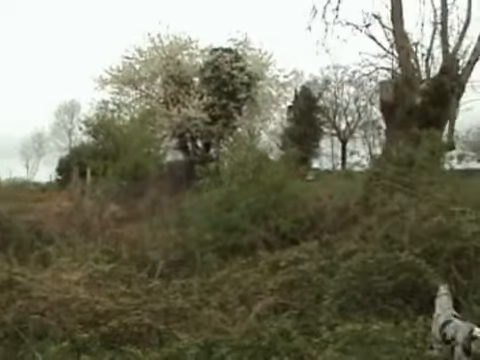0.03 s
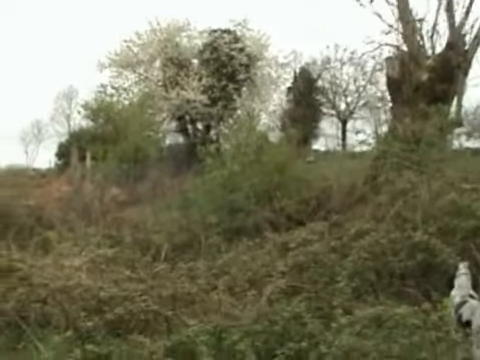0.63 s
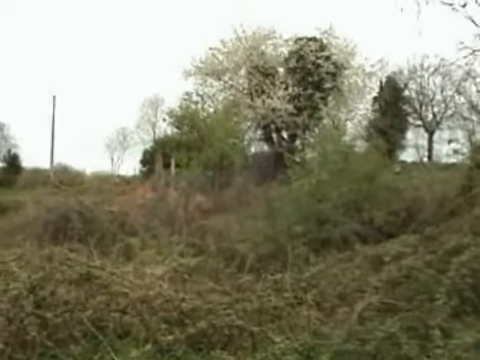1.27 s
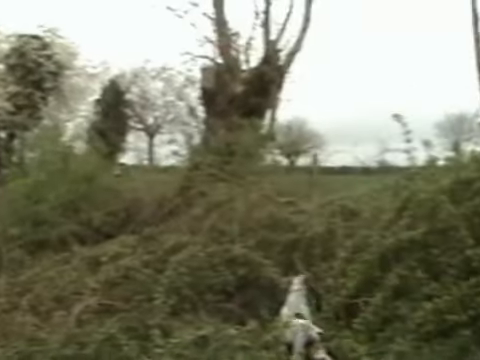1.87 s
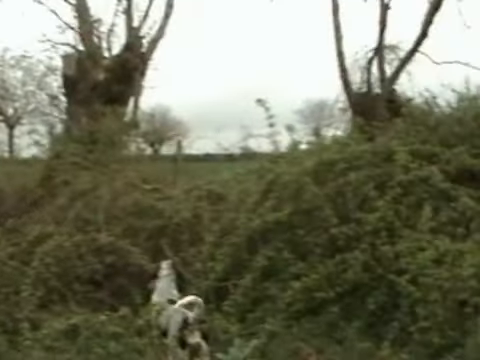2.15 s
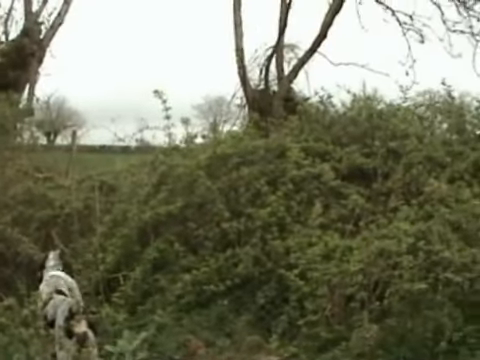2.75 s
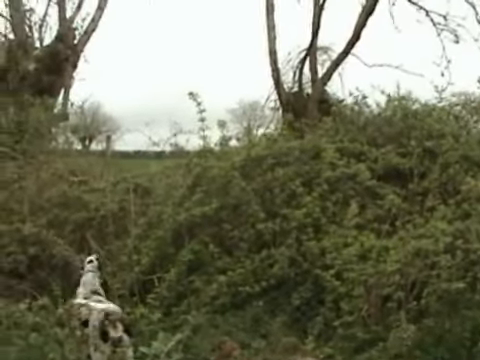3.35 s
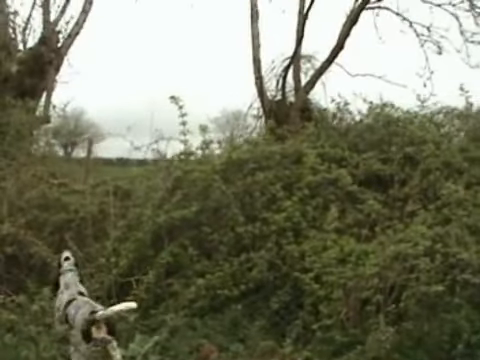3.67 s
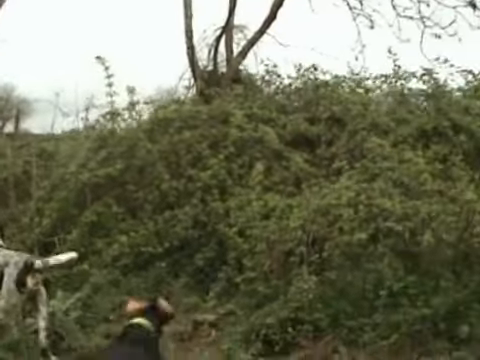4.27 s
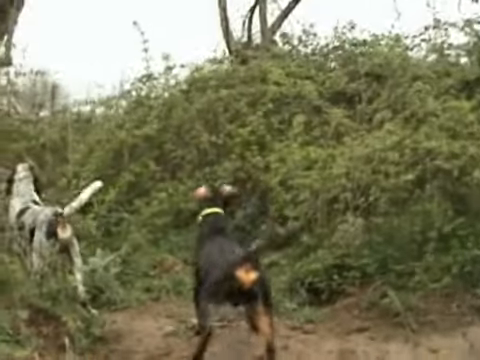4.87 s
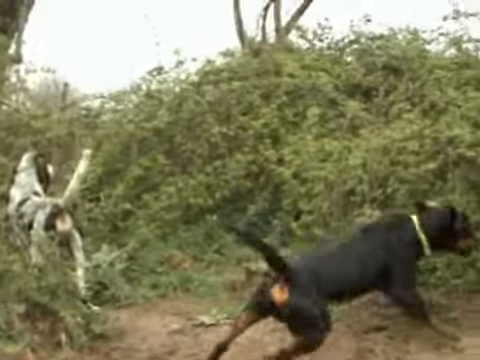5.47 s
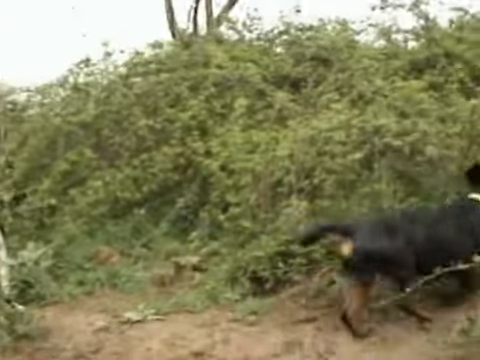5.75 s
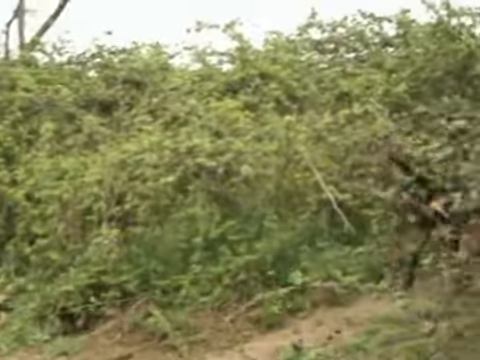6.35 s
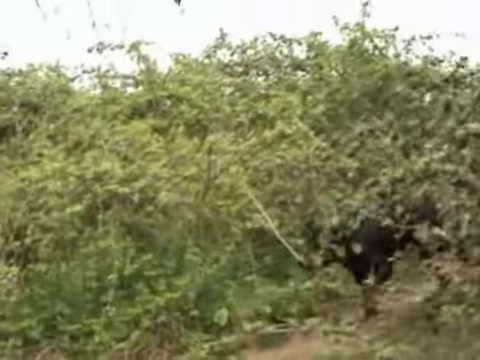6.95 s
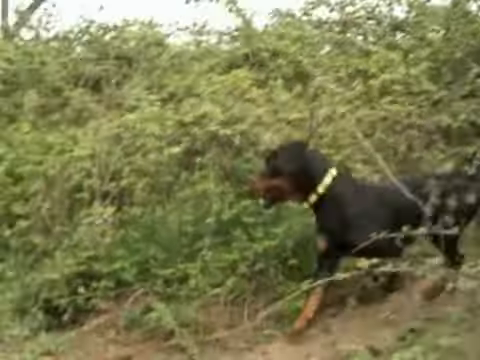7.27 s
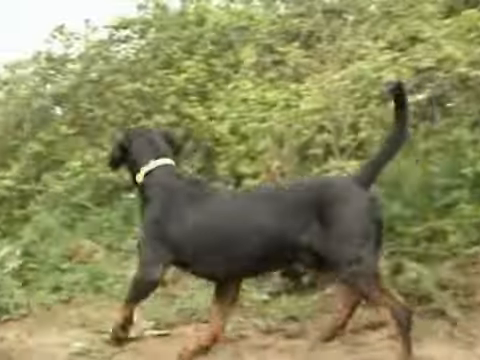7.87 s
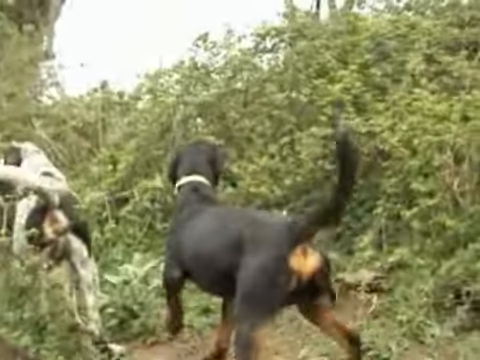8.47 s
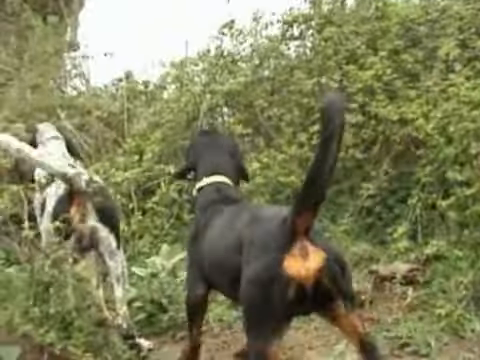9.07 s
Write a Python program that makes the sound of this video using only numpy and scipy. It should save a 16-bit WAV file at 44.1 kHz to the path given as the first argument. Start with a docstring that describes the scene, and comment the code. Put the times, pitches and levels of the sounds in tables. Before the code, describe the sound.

Quick yelping barks repeat unevenly from start to finish, a few metres from the microphone in open country. A second dog whines thinly, gives two drawn-out hoarse bays, whines again, then bays twice more among short whimpers, its voice cracking between rough and clear notes. Underneath are faint rustling scrub, occasional twig snaps and a low rumble, with only a light outdoor echo.

```python
"""Open farmland, at a bramble hedge: hunting dogs give tongue a few metres away.
One barks in quick yelps that arch in pitch as its jaw snaps open and shut. A hound answers with
long hoarse bays, its vocal folds locking into clean notes and cracking into chaotic flapping,
and with thin whines. Leaves and twigs crackle in the scrub; the hedges send back a faint echo."""
import sys
import numpy as np
from scipy import signal
from scipy.fft import rfft, irfft, next_fast_len
from scipy.io import wavfile
from scipy.ndimage import uniform_filter1d, minimum_filter1d, map_coordinates

SR = 44100
rng = np.random.default_rng(int(sys.argv[2]) if len(sys.argv) > 2 else 0)


def generate_wav(signal):
    """Clip the signal to [-1, 1] and save it as 16-bit WAV at the path in sys.argv[1]."""
    frames = np.transpose(np.atleast_2d(signal))
    scaled = np.clip(frames, -1, 1) * 32767
    pcm = np.round(scaled).astype(np.int16)
    wavfile.write(sys.argv[1], SR, pcm)


N = 407043


def amp(db):
    """Decibels to gain."""
    return 10 ** (np.asarray(db) / 20)


def unit(x):
    """Scale to rms 1."""
    return x / np.sqrt(np.mean(x ** 2) + 1e-20)


def along(points, hz):
    """(Hz, value) points read on a log axis."""
    freqs, values = np.transpose(points)
    return np.interp(np.log(hz + 1), np.log(freqs + 1), values)


def curves(rows, t):
    """Every column after the first, read at t."""
    times, *columns = np.transpose(rows)
    return [np.interp(t, times, column) for column in columns]


def span(start, end, fade_s):
    """Sample times and soft gate of one call."""
    t = np.arange(round((start - fade_s) * SR), round((end + 2 * fade_s) * SR)) / SR
    return t, np.clip((t - start) / fade_s + .5, 0, 1) * np.clip((end - t) / (2 * fade_s) + 1, 0, 1)


def add(track, t, x):
    """Mix x into the track at its sample times."""
    at = round(t[0] * SR) + np.arange(len(t))
    inside = (at >= 0) & (at < N)
    track[..., at[inside]] += x[..., inside]


def wobble(t, rate_hz):
    """Smooth random curve, rate_hz knots a second."""
    knots = rng.standard_normal(int((t[-1] - t[0]) * rate_hz) + 4)
    return map_coordinates(knots, [(t - t[0]) * rate_hz])


def bump(t, middle, length):
    """Flat-topped window."""
    return np.exp(-(2 * (t - middle) / length) ** 4)


def swell(age, length, attack_s, droop_db, release_s):
    """Attack, drooping hold, release."""
    attack = 1 - np.exp(-(np.maximum(age, 0) / attack_s) ** 2)
    release = np.exp(-np.maximum(age - length, 0) / release_s)
    return attack * amp(-droop_db * (age / length - .5)) * release


def coloured(x, spectrum):
    """x through a (Hz, dB) shape, at rms 1."""
    n = x.shape[-1]
    size = next_fast_len(n + 2048)
    gain = amp(along(spectrum, np.fft.rfftfreq(size, 1 / SR)))
    return unit(irfft(rfft(x, size) * gain, size)[..., :n])


def spread(mid, side, width):
    """Mid and side to stereo."""
    return (mid + width * side * np.array([[1], [-1]])) / np.hypot(1, width)


def stereo_noise(width):
    """Partly correlated white noise."""
    return spread(rng.standard_normal(N), rng.standard_normal(N), width)


# Air spectrum: (frequency [Hz], gain [dB])
AIR_SPECTRUM = [(25, -13.5), (200, -24), (1000, -8.5), (3000, -19.5), (6500, -22), (15500, -49.5)]


def still_air(level_db=-55.5):
    """Steady hush of country air."""
    return amp(level_db) * coloured(stereo_noise(width=.18), AIR_SPECTRUM)


# Hedge decay: (frequency [Hz], unscaled t60 [s])
HEDGE_DECAY = [(200, 0.76), (1000, 0.62), (2500, 0.96), (8000, 0.45)]


def hedge_echo(x, t60_scale, delay_s, width):
    """Diffuse scatter from vegetation; the top treble dies first."""
    hz, t, noise = signal.stft(rng.standard_normal((2, SR)), SR, nperseg=256)
    t60_s = t60_scale * along(HEDGE_DECAY, hz)[:, None]
    mid, side = signal.istft(noise * amp(-60 * t / t60_s), SR, nperseg=256)[1]
    tail = spread(mid, side, width) / np.linalg.norm(mid)
    delayed = np.pad(tail, ((0, 0), (int(delay_s * SR), 0)))
    return signal.fftconvolve(x[None], delayed, axes=1)[:, :N]


# Low rumble and rustling leaves: (time [s], rumble [dB], rustle [dB])
RUMBLE_AND_RUSTLE = [(0.0, -55.5, -52.5), (0.64, -55, -49.5), (1.23, -45, -59.5), (1.54, -60.5, -47.5),
                     (2.47, -63.5, -65.5), (2.9, -48.5, -44), (5.68, -55, -43.5), (6.6, -49, -36.5),
                     (7.58, -45, -50), (8.33, -46.5, -44), (8.76, -41, -70.5), (9.23, -48.5, -36.5)]
# Dry twigs: (time [s], level [dB])
TWIG_SNAPS = [(1.0814, -28.5), (3.599, -41.5), (3.737, -37.5), (4.107, -31), (4.1607, -29.5), (4.2095, -31),
              (5.34, -46.5), (5.3696, -34.5), (7.318, -44.5)]
# Spectra of rumble and of leaves and twigs: (frequency [Hz], gain [dB])
RUMBLE_SPECTRUM = [(20, -17), (60, 0), (130, 0), (220, -1.5), (330, -13.5), (800, -39)]
CRACKLE_SPECTRUM = [(300, 10), (3500, -5), (6500, -5), (10000, -20.5), (15500, -30)]


def rumble_and_scrub(rumble_trim_db=1, rustle_trim_db=-3, snap_trim_db=-2.5, snap_t60_s=.049):
    """Low rumble that swells around the calls, leaves rustling, twigs snapping."""
    t = np.arange(N) / SR
    rumble_db, rustle_db = curves(RUMBLE_AND_RUSTLE, t)
    lumps = amp(rumble_db + rumble_trim_db + 3.5 * wobble(t, 14))
    rumble = lumps * coloured(stereo_noise(width=1.3), RUMBLE_SPECTRUM)
    clumps = amp(4 * wobble(t, 25) + 7 * wobble(t, 600))
    leaves = coloured(clumps * stereo_noise(width=.13), CRACKLE_SPECTRUM)
    snaps = sum(amp(db - 60 * np.abs(t - at) / snap_t60_s) * (t >= at) for at, db in TWIG_SNAPS)
    twigs = snaps * coloured(stereo_noise(width=.32), CRACKLE_SPECTRUM)
    return rumble + amp(rustle_db + rustle_trim_db) * leaves + amp(snap_trim_db) * twigs


def clean_folds(t, pitch_hz, levels_db, jitter, shimmer_db):
    """Clean phonation, slightly unsteady in pitch and level: (voice, phase)."""
    unsteady_hz = pitch_hz * (1 + .0045 * wobble(t, 45) + jitter * wobble(t, 400))
    phase = 2 * np.pi * np.cumsum(unsteady_hz) / SR
    voice = sum(amp(db + shimmer_db * wobble(t, 60)) * np.sin(k * phase)
                for k, db in enumerate(levels_db, 1))
    return np.sqrt(2) * voice, phase


def rough_folds(phase, turbulence):
    """Glottal harmonics, phases spread by the throat, plus turbulence puffing once a cycle."""
    lags = rng.uniform(0, 2 * np.pi, 18)
    pulses = unit(sum(np.cos(k * phase + lag) for k, lag in enumerate(lags, 1)))
    puffs = unit((4.3 + np.cos(phase)) * rng.standard_normal(len(phase)))
    share = np.clip(turbulence, 0, 1)
    return np.sqrt(1 - share) * pulses + np.sqrt(share) * puffs


def muzzle_hiss(phase, spectrum, width):
    """Upper muzzle resonances; short detours over ground and leaves comb each call differently."""
    detours = rng.standard_normal((2, 260)) * np.exp(-np.arange(260) / 70)
    paths = [unit(signal.fftconvolve(rough_folds(phase, turbulence=.65), detour)[:len(phase)])
             for detour in detours]
    return coloured(spread(*paths, width), spectrum)


# Hound's snarl band: (frequency [Hz], gain [dB])
HOUND_SNARL = [(700, -44.5), (1150, -6), (1420, 12), (1700, 0.5), (2050, 2), (2350, -22), (2750, -44.5),
               (5000, -71)]


def hound_tract(x):
    """Mid resonances that colour the hound's breath and snarl."""
    return coloured(x, HOUND_SNARL)


# Contours, one list per call: (time [s], pitch [Hz], level [dB])
WHINE_CONTOURS = [
    [(0.335, 1218, -24.5), (0.345, 1240, -9), (0.367, 1177, -14.5), (0.679, 1190, -16), (0.731, 1228, -14),
     (0.971, 1181, -19), (1.063, 1081, -23), (1.08, 1070, -37)],
    [(4.57, 1323, -21.5), (4.62, 1225, -9), (4.644, 1202, -15), (4.656, 1335, -13), (4.696, 1372, -18),
     (4.892, 1082, -24.5), (5.134, 1030, -23), (5.15, 1063, -27.5)],
]
WHIMPER_CONTOURS = [
    [(6.01, 1216, -35), (6.026, 1191, -12.5), (6.084, 1172, -13.5), (6.12, 1126, -30)],
    [(6.845, 1142, -42), (6.857, 1087, -25), (6.893, 1150, -26.5), (6.99, 1081, -24.5)],
    [(7.205, 1176, -41), (7.215, 1127, -28.5), (7.317, 1143, -25.5), (7.325, 1094, -32)],
    [(8.93, 1200, -23), (9.0, 1127, -18), (9.124, 1189, -24.5), (9.22, 1078, -25)],
]
# Hoarse stretches: (middle [s], length [s], half-order level re note [dB])
VOICE_BREAKS = [(4.701, 0.57, -13.5), (4.918, 0.11, -22), (6.972, 0.086, -13), (7.265, 0.029, -5.5),
                (9.035, 0.043, -4)]
# Overtones the muzzle passes: (frequency [Hz], level re note [dB])
MUZZLE_OVERTONES = [(2050, -5.5), (2260, -5), (2400, -21), (2750, -22.5), (3500, -31), (4600, -35.5),
                    (6000, -38.5), (9000, -54)]


def whines(jitter=.006, shimmer_db=1.1, breath_db=-33):
    """A thin high note whose octave flares as it sinks into the muzzle's resonance."""
    out = np.zeros(N)
    for contour in list(WHINE_CONTOURS) + list(WHIMPER_CONTOURS):
        t, gate = span(contour[0][0], contour[-1][0], fade_s=.007)
        pitch_hz, level_db = curves(contour, t)
        # In a break the voice trembles and alternate cycles differ, doubling the period.
        tremble = 1 + 2 * sum(bump(t, at, length) for at, length, _ in VOICE_BREAKS)
        doubling = sum(bump(t, at, length) * amp(db) for at, length, db in VOICE_BREAKS)
        levels_db = [0] + [along(MUZZLE_OVERTONES, k * pitch_hz) for k in range(2, 9)]
        voice, phase = clean_folds(t, pitch_hz, levels_db, jitter * tremble, shimmer_db * tremble ** .5)
        half_orders = .49 * np.sin(phase / 2) + .47 * np.sin(1.5 * phase) + .17 * np.sin(2.5 * phase)
        breath = amp(breath_db) * tremble * hound_tract(rng.standard_normal(len(t)))
        add(out, t, gate * amp(level_db) * (voice + doubling * half_orders + breath))
    return out


# Clean notes in and around the bays: (start [s], length [s], attack [s], first pitch [Hz],
# middle pitch [Hz], last pitch [Hz], fundamental [dB], octave [dB], droop [dB])
BAY_NOTES = [(1.273, 0.047, 0.0044, 834, 901, 1092, -13.5, -26, 4.5),
             (1.32, 0.046, .006, 1142, 1105, 960, -18.5, -39.5, 16),
             (1.818, 0.12, 0.024, 436, 490.5, 497, -23.5, -51, 21.5),
             (3.284, 0.041, 0.0013, 637, 563, 544, -10.5, -35.5, 6),
             (4.168, 0.1, 0.023, 496, 496.6, 507.4, -14, -32.5, -2),
             (4.285, 0.034, 0.011, 500, 522, 507, -24.5, -49, 11.5),
             (6.069, .1, 0.011, 467, 626, 510, -11.5, -19, 1.5),
             (6.25, .56, .03, 440, 406.3, 533, -19.5, -27, 9),
             (6.75, 0.067, 0.017, 1225, 1290, 1295, -15.5, -38, 3),
             (7.892, 0.065, 0.0038, 783, 835, 948, -25, -22.5, -14),
             (8.12, .15, 0.02, 503.5, 538.3, 482, -18.5, -23, 4.5),
             (8.44, .19, 0.0088, 593.4, 527, 544, -20.5, -36, 9)]


def clear_notes(third_db=-14, fall_db=9, breath_db=-21):
    """Locked folds give one bending note: fundamental, octave, faint falling overtones."""
    out = np.zeros(N)
    for start, length, attack_s, first_hz, middle_hz, last_hz, db, octave_db, droop_db in BAY_NOTES:
        t, gate = span(start, start + length, fade_s=.0084)
        bend = np.polyfit([0, .5, 1], [first_hz, middle_hz, last_hz], 2)
        pitch_hz = np.polyval(bend, np.clip((t - start) / length, 0, 1))
        levels_db = [db, octave_db] + [(db + octave_db) / 2 + third_db - fall_db * k for k in range(6)]
        voice, _ = clean_folds(t, pitch_hz, levels_db, jitter=.015, shimmer_db=1.2)
        breath = amp(db + breath_db) * hound_tract(rng.standard_normal(len(t)))
        envelope = gate * swell(t - start, length, attack_s, droop_db, release_s=.014)
        add(out, t, envelope * (voice + breath))
    return out


def gliding_mouth(x, centre_hz, width_hz=420):
    """A resonance that follows the jaw, cross-faded across a filter bank."""
    steps_hz = np.arange(500, 1600, 100)
    size = next_fast_len(2 * len(x)) // 2 * 2
    hz = np.fft.rfftfreq(size, 1 / SR)
    peaks = (1 + (2 * (hz - steps_hz[:, None]) / width_hz) ** 2) ** -1.4
    low_cut = 1 / (1 + (380 / (hz + 1)) ** 8)
    bank = irfft(rfft(x, size) * peaks * low_cut)[:, :len(x)]
    fades = [np.interp(centre_hz, steps_hz, pick) for pick in np.eye(len(steps_hz))]
    return unit(sum(unit(band) * fade for band, fade in zip(bank, fades)))


def limit_swing(x, squeeze):
    """Folds can only swing so far: the largest surges flatten."""
    power = np.abs(uniform_filter1d(x ** 2, size=220))
    return unit(x / (power + .14) ** (squeeze / 2))


# Bays: (start [s], length [s], level [dB], mouth at onset [Hz], at middle [Hz], at end [Hz],
# chest [dB], snarl [dB], hiss [dB]); last three re mouth, before offsets
HOARSE_BAYS = [(1.313, 0.61, -14.5, 1051, 690, 940, -8.5, -15, -30),
               (3.314, 0.98, -15.5, 800, 680, 953, -6, -16.5, -33.5),
               (6.219, .64, -15, 926, 980, 1330, 1, -17, -24.5),
               (6.985, 0.28, -24, 915, 920, 1030, -2.5, -7.5, -29.5),
               (7.121, 0.057, -12, 1167, 1250, 1210, -10.5, -19, -22),
               (7.925, .66, -14.5, 1080, 1058, 1013, -1, -7, -28)]
# Catches in the voice: (middle [s], length [s], depth [dB])
BAY_CATCHES = [(3.631, 0.081, 7), (3.761, .04, 6), (6.359, 0.064, 9.5), (8.044, 0.03, 5.5)]
# Chest and muzzle resonances: (frequency [Hz], gain [dB])
HOUND_CHEST = [(110, -25.5), (205, -27), (285, -25.5), (350, -5.5), (420, -9.5), (500, 2.5), (580, -12.5),
               (750, -51.5), (1200, -62.5)]
HOUND_HISS = [(2200, -14), (3000, -7.5), (3600, -14.5), (4400, -2.5), (5100, 2), (6000, 1.5), (6900, -6),
              (7600, -10), (9500, -26.5), (15500, -45)]


def hoarse_bays(rattle_hz=215, jitter=.09, lurch=.3, flutter_db=2.2, settle_s=.094, release_s=.11):
    """Folds flap chaotically near half their pitch, strong and weak in turn, shaking the throat."""
    out = np.zeros((2, N))
    for start, length, db, onset_hz, middle_hz, end_hz, chest_db, snarl_db, hiss_db in HOARSE_BAYS:
        t, gate = span(start, start + length, fade_s=.011)
        age = t - start
        # The jaw settles after the onset, reopens late, then shuts.
        onset = np.exp(-(age / settle_s) ** 2)
        reopen = np.clip(age / length, 0, 1) ** 4.9
        mouth_hz = middle_hz + (onset_hz - middle_hz) * onset + (end_hz - middle_hz) * reopen
        shut_db = 28.5 * np.clip(1 - (length - age) / min(release_s, length / 2), 0, 1) ** 2
        linger_db = .92 * shut_db  # snarl and hiss outlast the mouth
        catch_db = sum(depth_db * bump(t, at, wide) for at, wide, depth_db in BAY_CATCHES)
        pitch_hz = rattle_hz * (1 + .05 * wobble(t, 18) + jitter * wobble(t, 300))
        phase = 2 * np.pi * np.cumsum(pitch_hz) / SR
        source = rough_folds(phase, turbulence=.4) * (1 + lurch * np.cos(phase / 2))
        mouth = limit_swing(gliding_mouth(source, mouth_hz), squeeze=.5)
        chest = amp(chest_db - 6.5) * limit_swing(coloured(source, HOUND_CHEST), squeeze=1)
        snarl = amp(snarl_db - 8 + 16.5 * onset + linger_db) * hound_tract(source)
        hiss_gain = amp(hiss_db + 7 * onset + linger_db + 1.9 * wobble(t, 16))
        hiss = hiss_gain * muzzle_hiss(phase, HOUND_HISS, width=.13)
        envelope = gate * amp(db - shut_db - catch_db + flutter_db * wobble(t, 90.5))
        add(out, t, envelope * (mouth + chest + snarl + hiss))
    return out


def pitch_arch(progress, top_at=.45, rise=.25, sag=.21, floor=.42):
    """Bark pitch as a share of its top: two half parabolas."""
    past = progress - top_at
    drop = np.where(past < 0, rise * (past / top_at) ** 2, sag * (past / (1 - top_at)) ** 2)
    return np.maximum(1 - drop, floor)


# Barks: (start [s], nominal length [s], top pitch [Hz], fundamental [dB], mouth [dB], snarl [dB])
YELPS = [(-.1, 0.16, 450, -20.5, -32, -33.5), (.093, .15, 473.6, -17, -27, -29),
         (0.306, .15, 461.3, -28, -24, -26), (0.736, 0.18, 500.4, -19.5, -27, -29.5),
         (0.941, 0.16, 455.3, -25, -24.5, -23.5), (1.482, 0.13, 504, -26.5, -26.5, -23.5),
         (2.054, .14, 502.6, -20, -22, -21), (2.603, 0.14, 526.3, -15, -17, -18.5),
         (2.798, .17, 457, -18, -19.5, -23.5), (3.023, 0.15, 444.6, -22.5, -17, -20),
         (3.471, .15, 503, -22, -20.5, -28), (3.964, 0.12, 527.6, -16.5, -19, -20),
         (4.48, .119, 519, -15, -19, -18), (5.006, 0.17, 529, -14.5, -21, -23),
         (5.528, 0.12, 546, -5.5, -20.5, -15), (5.712, .15, 467, -13, -25, -22),
         (5.918, 0.18, 436.4, -19, -20.5, -21.5), (6.16, .18, 441, -21.5, -21, -23.5),
         (6.537, .13, 507.7, -20, -37, -19.5), (7.063, .125, 561.2, -18, -11.5, -10.5),
         (7.539, .14, 503.4, -13, -27, -27), (8.402, 0.12, 540.6, -22.5, -12, -18.5),
         (8.81, 0.11, 524.6, -17, -24, -23.5), (9.034, 0.13, 533.7, -17, -13.5, -21)]
# Mouth and muzzle resonances: (frequency [Hz], gain [dB])
YELP_MOUTH = [(150, -25.5), (500, -10), (720, -9.5), (900, -7.5), (1050, -7.5), (1250, -13.5), (1700, -32),
              (3000, -95.5)]
YELP_SNARL = [(700, -55), (1100, -7.5), (1330, -6), (1650, 3), (1950, -3.5), (2250, -9.5), (2600, -23),
              (3100, -37.5), (5000, -61)]
YELP_HISS = [(1800, -22), (2900, -10.5), (3550, -5), (4100, -10), (4700, -8.5), (6200, -5), (7400, -12.5),
             (9500, -25), (15500, -37.5)]


def barks(flutter_db=2, burst_s=.021, hum_db=-21, easy_snarl_db=-22.5, easy_hiss_db=-43.5):
    """Each bark arches up as the jaw snaps open, then darkens and sags as it closes."""
    out = np.zeros((2, N))
    for start, length, top_hz, low_db, mouth_db, snarl_db in YELPS:
        t = start + np.arange(-SR // 100, int(1.7 * length * SR)) / SR
        age = t - start
        turbulence = .34 + .25 * np.exp(-(age / burst_s) ** 2)  # roughest at the start
        waver = 1 + .014 * wobble(t, 70) + .058 * turbulence * wobble(t, 420)
        phase = 2 * np.pi * np.cumsum(top_hz * pitch_arch(age / length) * waver) / SR
        low_env = swell(age, .84 * length, attack_s=.028, droop_db=.5, release_s=.005)
        # Slack folds hum on after the jaw shuts.
        low_env += amp(hum_db) * swell(age, length, attack_s=.02, droop_db=0, release_s=.045)
        mouth_env = swell(age, .91 * length, attack_s=.021, droop_db=5, release_s=.014)
        snarl_env = swell(age, .79 * length, attack_s=.02, droop_db=17.5, release_s=.02)
        hiss_env = swell(age, length, attack_s=.021, droop_db=13, release_s=.022)
        flutter = lambda: flutter_db * wobble(t, 140)
        low = amp(low_db + turbulence * flutter()) * unit(np.cos(phase))
        mouth = amp(mouth_db + flutter()) * coloured(rough_folds(phase, turbulence), YELP_MOUTH)
        snarl = amp(snarl_db + flutter()) * coloured(rough_folds(phase, 1.3 * turbulence), YELP_SNARL)
        hiss_db = easy_hiss_db + 1.16 * (snarl_db - easy_snarl_db)  # grows faster than the snarl
        hiss = amp(hiss_db) * muzzle_hiss(phase, YELP_HISS, width=.4)
        add(out, t, low_env * low + mouth_env * mouth + snarl_env * snarl + hiss_env * hiss)
    return out


def scene():
    """Dogs before the near brambles, far hedges answering."""
    dogs = barks() + hoarse_bays() + clear_notes() + whines()
    mono = dogs.mean(axis=0)
    near = amp(-10.5) * hedge_echo(mono, t60_scale=.24, delay_s=.004, width=.33)
    far = amp(-22) * hedge_echo(mono, t60_scale=.76, delay_s=.038, width=.24)
    balance_db = [[-.3], [.3]]
    return dogs * amp(balance_db) + near + far + still_air() + rumble_and_scrub()


def record(dry, ceiling=.93, window_samples=441, top_hz=15800):
    """Peak limiter, then brick-wall low-pass."""
    needed_gain = 1 / np.maximum(1, np.abs(dry).max(axis=0) / ceiling)
    gain = uniform_filter1d(minimum_filter1d(needed_gain, window_samples), window_samples)
    size = next_fast_len(N + SR // 2)
    passband = np.fft.rfftfreq(size, 1 / SR) < top_hz
    return irfft(rfft(dry * gain, size) * passband, size)[:, :N]


dry = scene()
out = record(dry)
generate_wav(out)
```